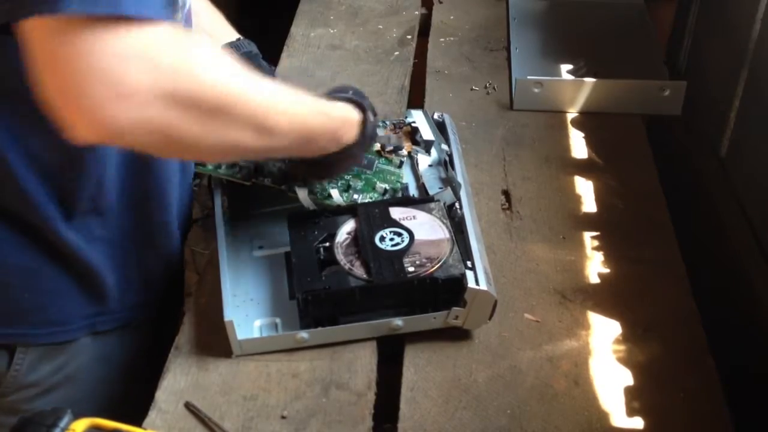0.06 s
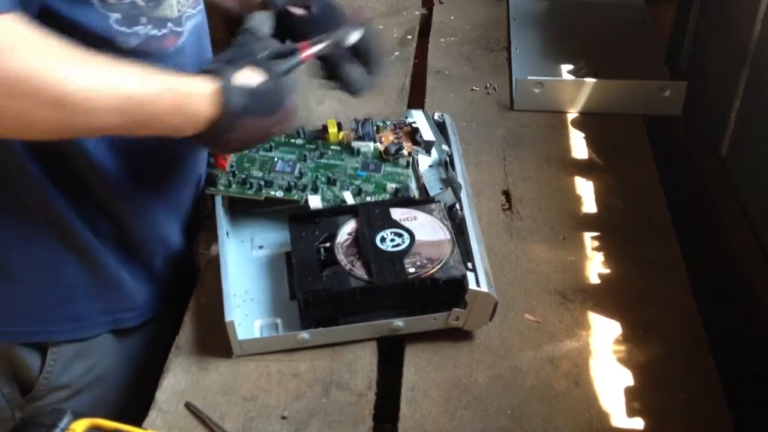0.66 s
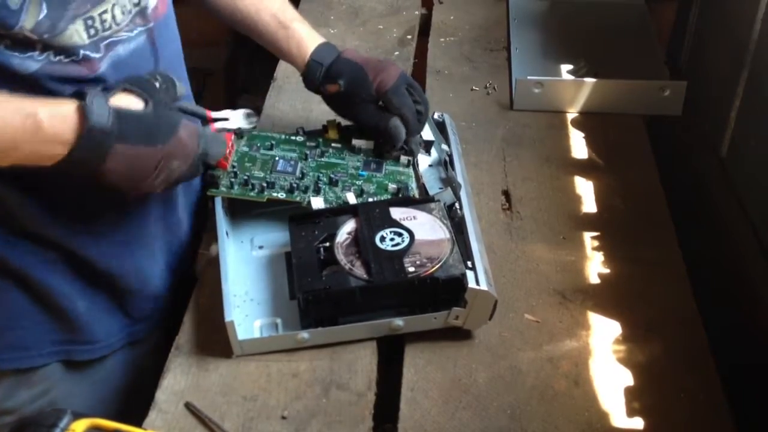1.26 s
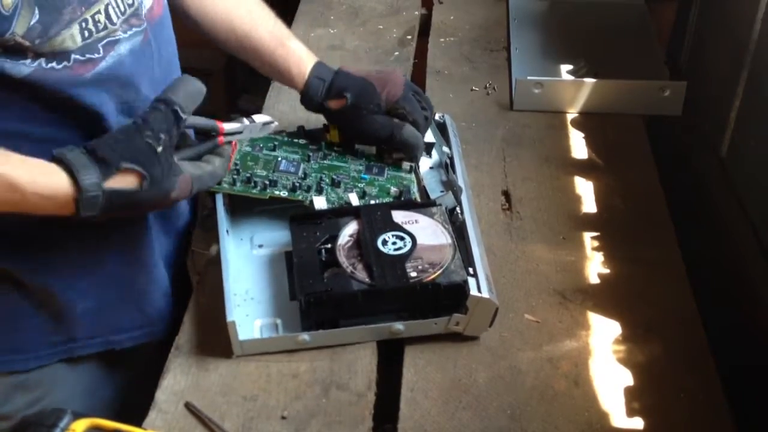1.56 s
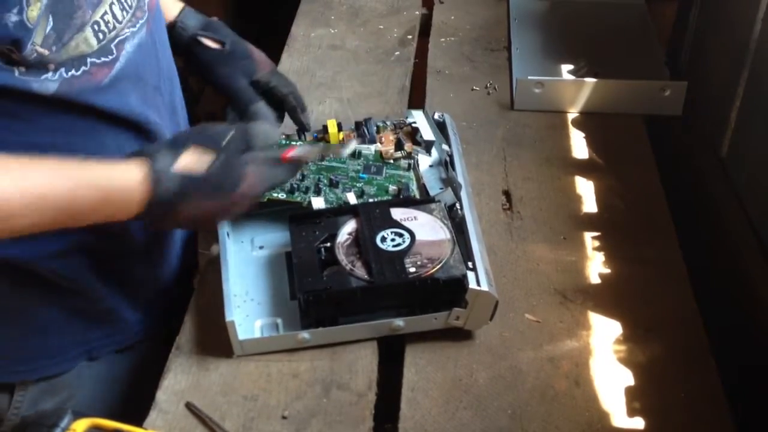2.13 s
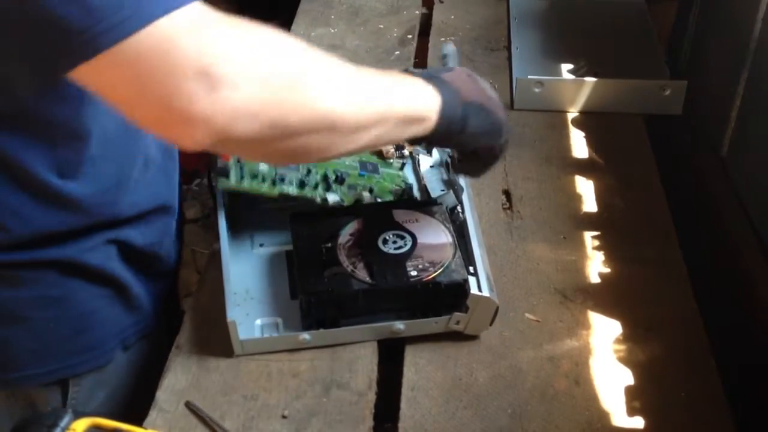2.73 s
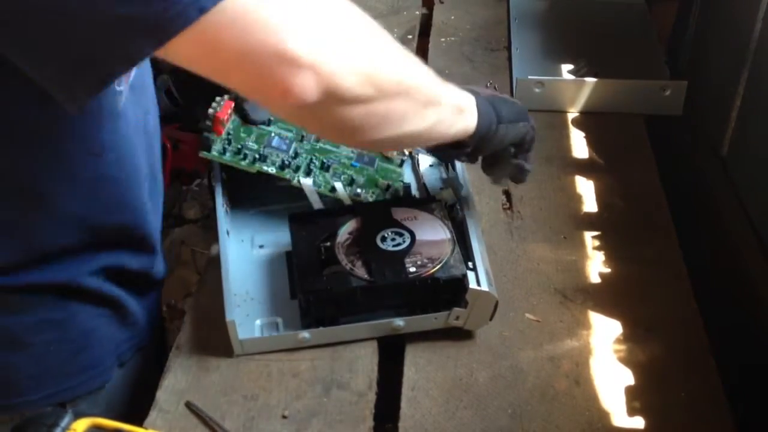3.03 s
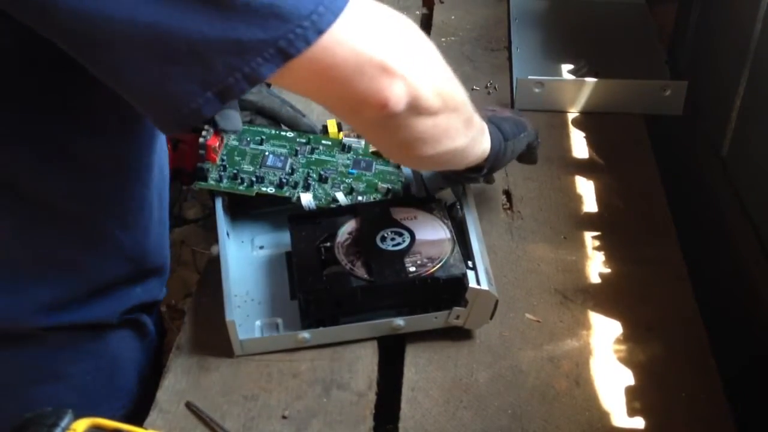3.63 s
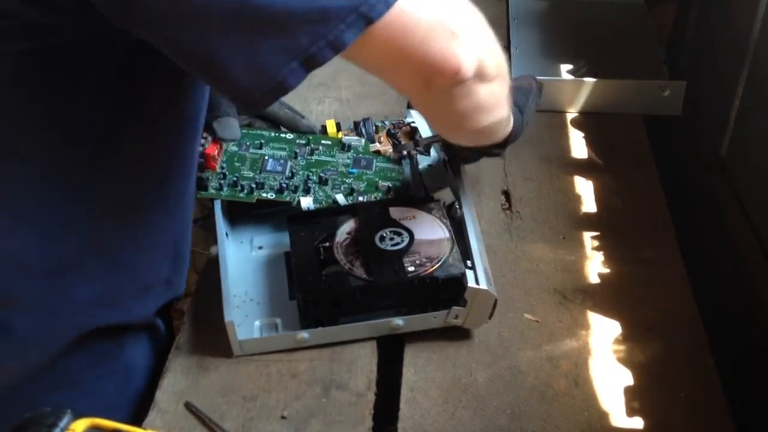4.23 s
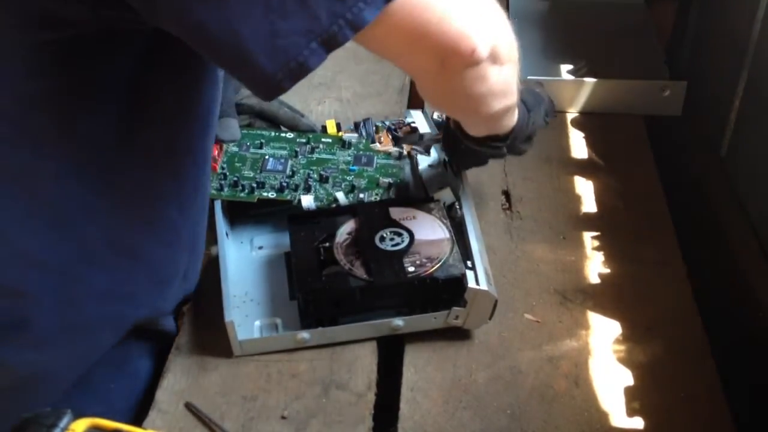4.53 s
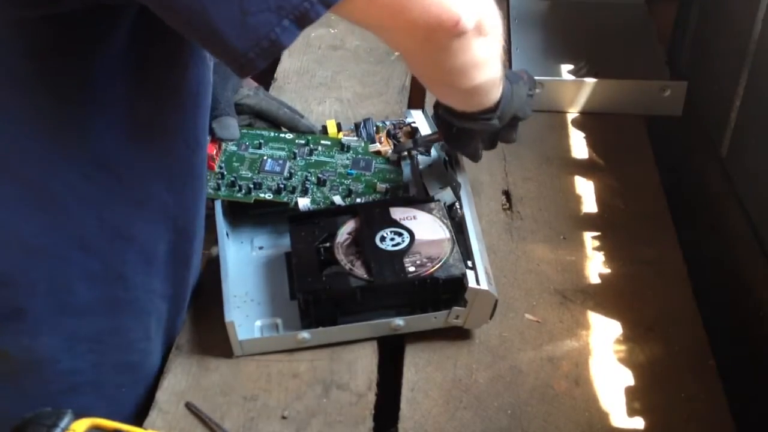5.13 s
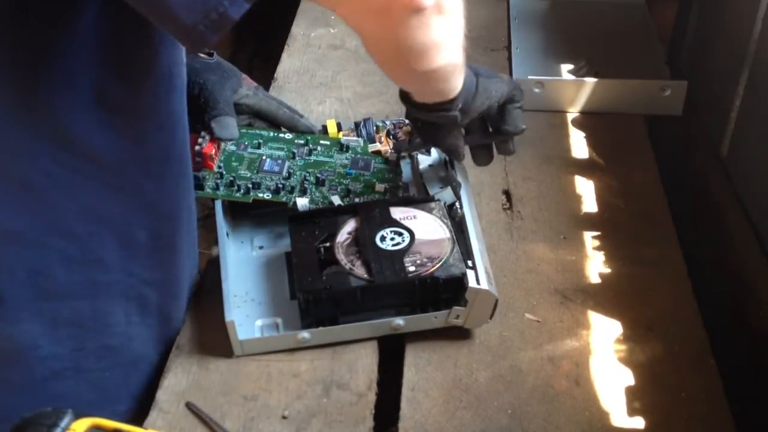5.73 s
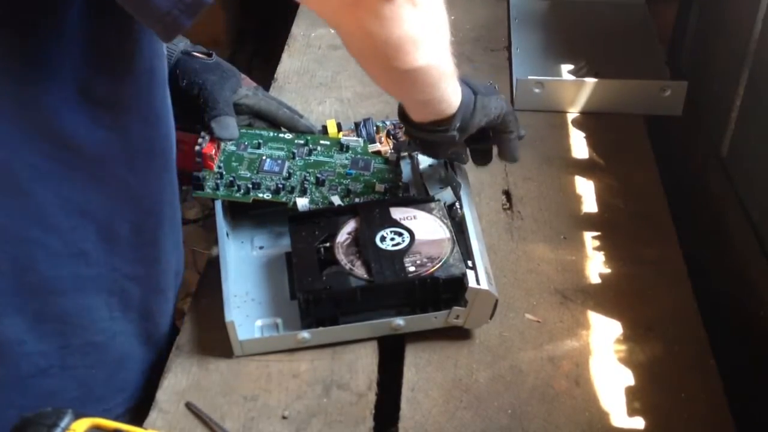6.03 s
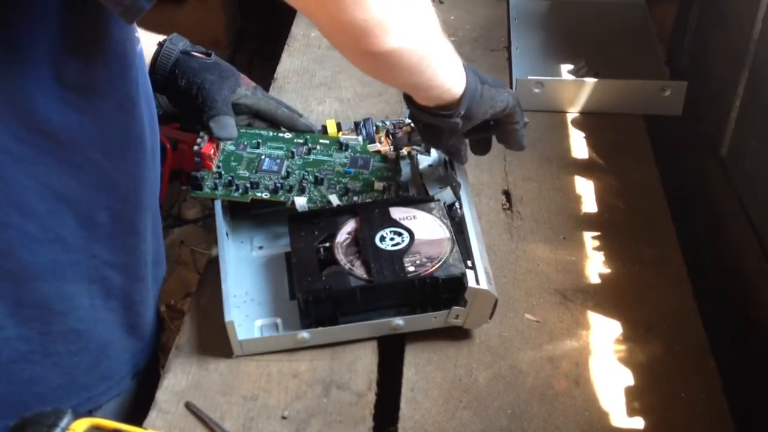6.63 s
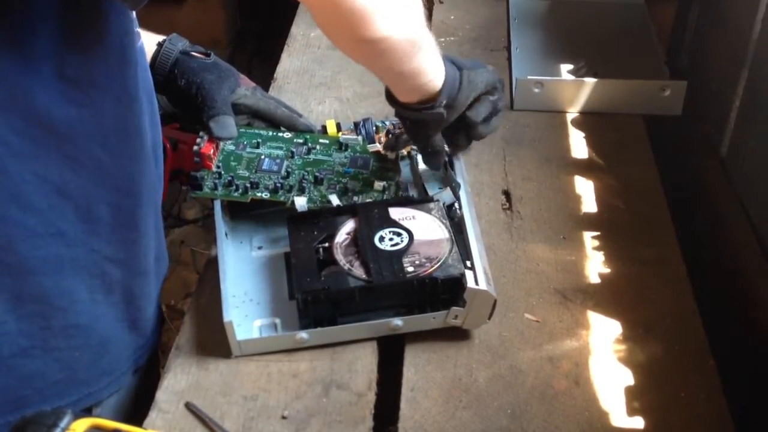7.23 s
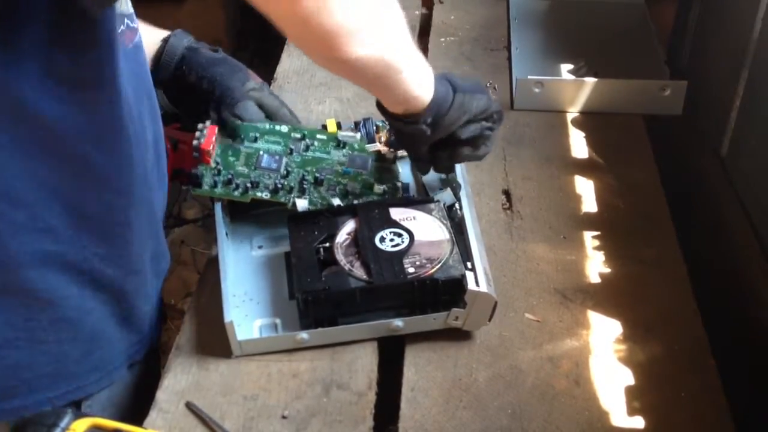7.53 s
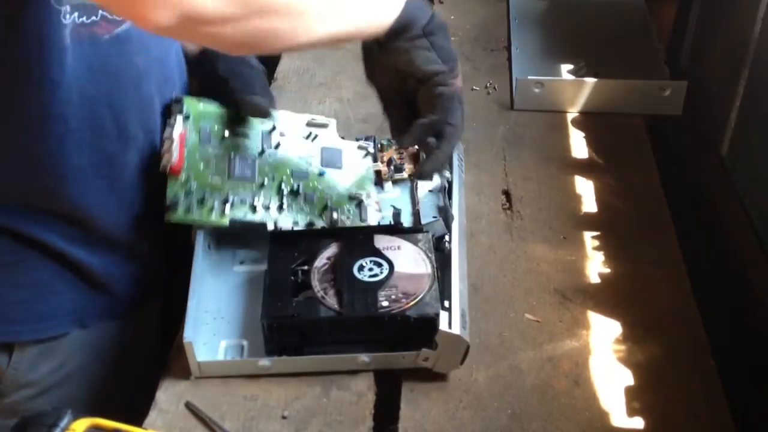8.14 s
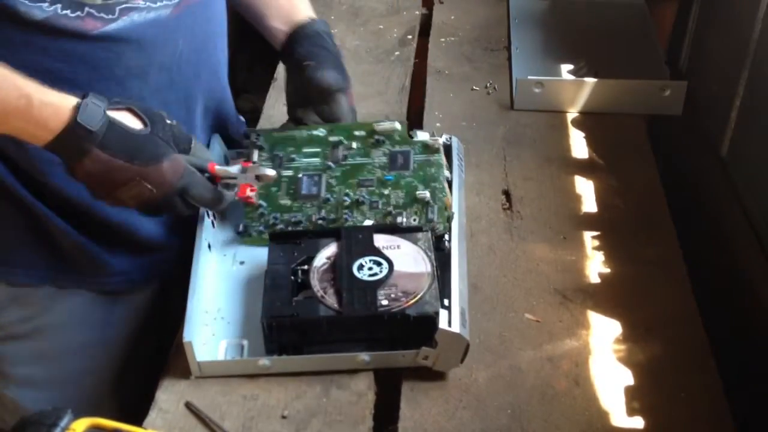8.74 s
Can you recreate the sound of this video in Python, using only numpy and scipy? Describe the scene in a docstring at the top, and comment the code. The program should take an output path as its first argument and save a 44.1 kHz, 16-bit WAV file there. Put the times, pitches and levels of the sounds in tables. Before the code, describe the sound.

Gloves rustle and a circuit board clacks against sheet metal on a wooden bench, with two sharp snips of wire clippers.

```python
"""In a small shed, gloves rustle as a circuit board is shifted, knocked and scraped in a sheet-metal
chassis; each contact excites the modes of the board, the chassis and the plank bench beneath.
From about 4 s a bird chips faintly outside. Wire clippers snip a metal clip at 4.4 s and another
at 7.3 s, each a crack of fracture with a brief ring of steel; a faint high tone wavers from 5.9 to 7.6 s.
Last, the board is lifted out, turned over and dropped in, its bracket landing at 8.5 s."""
import sys
import numpy as np
from scipy import signal
from scipy.fft import rfft, irfft
from scipy.io import wavfile
from scipy.ndimage import uniform_filter1d

SR = 44100
rng = np.random.default_rng(int(sys.argv[2]) if len(sys.argv) > 2 else 0)


def wav_record(signal):
    """Record a signal, one row per channel, as 16-bit PCM in the file named by sys.argv[1]."""
    frames = np.transpose(np.atleast_2d(signal))
    bounded = np.clip(frames, -1, 1)
    # unit amplitude maps onto the largest positive 16-bit level
    quanta = np.round(bounded * 32767).astype(np.int16)
    wavfile.write(sys.argv[1], SR, quanta)


N = 391608
T = np.arange(SR // 2) / SR  # time within one event, s
ORDINARY_HARDNESS_DB = -11.5  # hardness is the level of a contact's tick over its clack

# Spectrum of the still air: frequency_hz, gain_db
AIR_SPECTRUM = [(30, -35.5), (60, -35), (130, -3.5), (210, -7), (280, -12), (430, -18), (600, -16.5),
                (1000, -23), (2000, -26.5), (2850, -23), (3600, -24), (4600, -31.5), (15000, -37)]
# Effort of gloves and sleeves rubbing on the work: time_s, level_db
HANDLING_EFFORT = [(0.0, -63.5), (0.34, -59), (0.81, -63.5), (1.01, -54.5), (1.24, -63.5), (2.07, -67.5),
                   (2.62, -56.5), (3.31, -63), (5.71, -74.5), (7.2, -64), (7.54, -52), (8.41, -58),
                   (8.56, -48), (8.88, -54.5)]
# Spectrum of rubbing cloth: frequency_hz, gain_db
CLOTH_SPECTRUM = [(400, -11), (900, 2), (1500, -3), (2800, 0.5), (3600, -7), (4400, -16), (7500, -17.5),
                  (10000, -22), (15000, -17.5)]
# Modes of the chassis floor panel: pitch_hz, gain_db, t60_s
FLOOR_MODES = [(395.5, -3, 0.085), (400, -12, 0.1535), (413, 7.5, 0.2), (436.5, 6, 0.17),
               (481.5, -12.5, 0.207), (518, -8.5, 0.29)]
# Modes of the loaded bench planks: pitch_hz, gain_db, t60_s
PLANK_MODES = [(100.3, -9.5, 0.41), (125, -3, 0.2), (140.1, -1, 0.88), (166.3, 2, 0.51), (210.1, 9, 0.22),
               (223.1, 5.5, 0.33), (273.4, -6, 0.22)]
# Board and tool striking the chassis: start_s, clack_db, hardness_db, centre_hz, chatter_s, thud_db
STRIKES = [ (0.062, -54, -14, 1790, .013, -53.5), (0.162, -40, -12, 3030, 0.018, -52.5),
           (0.402, -39.5, -14.5, 2170, .006, -47), (0.477, -33, -6.5, 2560, 0.0099, -36.5),
           (0.498, -31, -17.5, 2030, 0.031, -28.5), (0.515, -40, -9.5, 2100, 0.034, -28.5),
           (0.757, -54, -13, 1720, 0.023, -42), (0.801, -35.5, -13.5, 1540, 0.014, -41),
           (0.824, -39.5, -13.5, 1400, 0.019, -44.5), (0.978, -41, -17, 2140, 0.0066, -45.5),
           (1.089, -43, -13.5, 1700, 0.018, -51), (1.15, -50.5, -10.5, 1470, 0.041, -39),
           (1.203, -44.5, -20, 1400, 0.0081, -57.5), (1.522, -39.5, -17, 1600, 0.017, -29.5),
           (1.645, -40.5, -12.5, 1990, .007, -47), (1.689, -43.5, -11, 1490, 0.013, -40.5),
           (1.978, -55.5, -24, 1630, 0.026, -46.5), (2.205, -43.5, -14, 1430, 0.013, -48.5),
           (2.326, -39, -16, 1800, 0.023, -27), (2.481, -43.5, -14.5, 2210, 0.01, -36),
           (2.523, -40, -12, 1550, 0.021, -38.5), (2.82, -41.5, -4, 2410, 0.0068, -60),
           (2.841, -36.5, -3, 2290, 0.0095, -36.5), (3.113, -43, -9, 1790, 0.0086, -32.5),
           (3.35, -76, -16, 1900, 0.0069, -49.5), (4.359, -60, -9, 2120, .003, -69),
           (4.436, -30, -9.5, 1470, 0.0099, -33.5), (5.136, -56.5, -15, 1880, .008, -60),
           (6.084, -53.5, -9, 2490, 0.0041, -59.5), (6.191, -55, -15.5, 1860, 0.014, -50),
           (6.303, -55.5, -7, 2440, .015, -57), (6.509, -57.5, -13, 2100, 0.0036, -61.5),
           (6.867, -45, -6, 2040, .004, -47), (6.88, -33, -13, 2110, .013, -38),
           (7.153, -32, -10, 2590, 0.011, -37.5), (7.343, -35, -10, 2000, 0.009, -37.5),
           (7.535, -46, -24, 1770, 0.022, -26.5), (7.652, -35, -12.5, 2290, 0.0079, -32),
           (7.68, -40, -10.5, 1680, 0.019, -28), (7.872, -50.5, -14, 2300, 0.036, -37.5),
           (8.016, -32, -10, 2200, 0.0028, -34.5), (8.072, -38.5, -11.5, 2100, .003, -39.5),
           (8.096, -38.5, -12, 2100, 0.0065, -39.5), (8.161, -31, -10.5, 2260, 0.0044, -33.5),
           (8.19, -36.5, -12.5, 2010, 0.0092, -38), (8.288, -53.5, -7, 1940, 0.0046, -48),
           (8.389, -33, -6.5, 1540, .007, -40), (8.485, -21.5, -12.5, 1920, 0.031, -15.5),
           (8.538, -22.5, -11.5, 2040, 0.019, -24), (8.618, -39.5, -12, 1590, 0.033, -23),
           (8.699, -45.5, -6.5, 1750, 0.0063, -58)]
# Spectrum of the board's dense ring: frequency_hz, gain_db
BOARD_SPECTRUM = [(300, -33), (600, 2.5), (1000, 2.5), (1400, -2.5), (2000, -7.5), (3000, -1), (3650, -3.5),
                  (4200, -13.5), (6000, -50)]
# Modes of the board and chassis walls: pitch_hz, gain_db, t60_s
BOARD_WALL_MODES = [(1022, -12.5, 0.037), (1070.4, 2, 0.12), (1173, -5, 0.12), (1324, -8, 0.25),
                    (1639, 8, 0.024), (2213, 12, 0.04), (2364, 6, 0.026), (2620, -0.5, 0.092),
                    (3034, 0.5, 0.14), (3710, 4.5, 0.028)]
# Spectrum of the fine tick of a contact: frequency_hz, gain_db
TICK_SPECTRUM = [(2500, -35), (4300, -4.5), (6000, 3.5), (8000, 3), (9800, -3.5), (12000, -2),
                 (14000, -6.5), (15500, -15.5)]
# Spectra of the panel's damped flexing and of its whole thud: frequency_hz, gain_db
FLEX_SPECTRUM = [(250, -18.5), (370, -7), (430, -6), (510, -3.5), (600, -21), (1000, -7.5), (1800, -44)]
PANEL_SPECTRUM = [(200, -9), (370, 5.5), (500, 6), (700, -4.5), (1500, -14.5)]
# Spectra of the planks' damped sag and of their whole thud: frequency_hz, gain_db
SAG_SPECTRUM = [(60, -28.5), (120, 6.5), (290, -7.5), (500, -26.5)]
BENCH_SPECTRUM = [(50, -12.5), (110, 0), (280, 9.5), (600, -16)]
# Board edge dragged over metal: start_s, length_s, scrape_db, panel_db, bench_db
DRAGS = [(0.24, 0.072, -50, -50.5, -61), (0.34, .13, -50, -39, -40.5), (0.81, .07, -66, -43, -40),
         (1.0, 0.15, -52, -43.5, -47.5), (1.495, 0.027, -48.5, -41.5, -51), (1.69, 0.099, -49, -42, -49.5),
         (2.49, 0.071, -42, -42.5, -45.5), (2.68, .11, -52.5, -43, -52), (3.09, 0.08, -50.5, -33, -36.5),
         (7.135, 0.064, -46, -32.5, -60), (7.56, 0.07, -38.5, -37, -34.5), (7.665, 0.088, -41, -31, -56),
         (8.11, 0.03, -47.5, -37, -36.5), (8.76, 0.087, -49, -51, -56)]
# Calls of the distant bird: time_s, level_db
BIRD_CALLS = [(3.97, -76), (4.9, -77), (5.71, -78), (6.65, -73), (7.12, -75), (7.84, -69)]
# Steel on steel, two cuts and then the bracket landing: start_s, pitch_hz, ring_db, decay_s, crack_db
STEEL_SNAPS = [(4.4282, 1950, -13.5, 0.0015, -17.5), (7.3429, 1890, -11, 0.0012, -24.5),
               (8.4855, 1756, -14.5, 0.0034, -22.5)]
# Modes of the jaws and the cut clip: pitch_ratio, gain_db
STEEL_MODES = [(1, 1), (1.3, -4.5), (2.45, -17.5)]
# Spectrum of the fracture: frequency_hz, gain_db
CRACK_SPECTRUM = [(200, -36), (500, -4), (1200, -4), (1700, 2.5), (2700, 6), (4300, -0.5), (6500, -5),
                  (8400, 1.5), (9800, -5), (11500, 2.5), (15000, -10.5)]


def undb(db):
    """Convert decibels to an amplitude ratio."""
    return 10 ** (np.asarray(db) / 20)


def level(x, db):
    """Set the overall rms level."""
    return x * undb(db) / np.sqrt(np.mean(x ** 2))


def loudest(x, db, size):
    """Set the rms level of the loudest stretch of `size` samples."""
    return x * undb(db) / np.sqrt(uniform_filter1d(x ** 2, size, mode="constant").max())


def unit(x):
    """Normalise to unit energy."""
    return x / np.sqrt(np.sum(x ** 2))


def add(out, start_s, x):
    """Superposition: x adds to the sound already present."""
    i = max(int(start_s * SR), 0)
    out[i:i + len(x)] += x[:max(N - i, 0)]


def through(x, response):
    """Convolution: a linear system acts through its impulse response."""
    return signal.fftconvolve(x, response)[:len(x)]


def colour(x, spectrum, size=2048):
    """Minimum-phase filtering: folding the cepstrum gives a causal response with this spectrum."""
    hz, db = np.transpose(spectrum)
    bins_hz = np.maximum(np.arange(size // 2 + 1) * SR / size, 1)
    gain = undb(np.interp(np.log(bins_hz), np.log(hz), db))
    cepstrum = irfft(np.log(gain))
    cepstrum[1:size // 2] *= 2
    cepstrum[size // 2 + 1:] = 0
    return through(x, irfft(np.exp(rfft(cepstrum))))


def fade(t60_s):
    """Exponential damping, 60 dB down after t60_s."""
    return np.exp(-np.log(1000) * T / t60_s)


def arch(length_s):
    """A half-sine pulse."""
    return np.sin(np.pi * np.minimum(T / length_s, 1))


def drift(size):
    """Low-passed noise of unit rms, turning about every `size` samples."""
    smoothed = uniform_filter1d(rng.standard_normal(N), size, mode="wrap")
    return level(uniform_filter1d(smoothed, size, mode="wrap"), 0)


def ring(modes, scatter_db, detune):
    """Modal response: a sum of damped sinusoids, weighted differently at every point of contact."""
    hz, db, t60_s = np.transpose(modes)[:, :, None]
    strength, mistuning, side = rng.standard_normal((3, len(modes), 1))
    waves = np.sign(side) * np.sin(2 * np.pi * hz * (1 + detune * mistuning) * T)
    return np.sum(undb(db + scatter_db * strength) * fade(t60_s) * waves, axis=0)


def shed(x, near_db, far_db):
    """Diffuse reverberation: click energy returns as noise, first from the bench, then the walls."""
    near = undb(near_db) * unit(fade(t60_s=.06) * (T > .002))
    far = undb(far_db) * unit(fade(t60_s=.25) * (T > .008))
    energy = through(x ** 2, near ** 2 + far ** 2)
    return x + np.sqrt(abs(energy)) * rng.standard_normal(len(x))


def reverberate(x, near_db, far_db):
    """Reflections smear a tone: it is convolved with the shed's response to an impulse."""
    return through(x, shed(1. * (T == 0), near_db, far_db))


def slips(per_s, spread_db, size):
    """Stick-slip friction: a random train of impulses of uneven strength."""
    slipping = rng.random(size) < per_s / SR
    strength = undb(spread_db * np.clip(rng.standard_normal(size), -2, 2))
    return slipping * strength * rng.choice([-1, 1], size)


def still_air():
    """Ambient noise: steady and broadband, strongest in the bass."""
    return level(colour(rng.standard_normal(N), AIR_SPECTRUM, size=8192), db=-65)


def handling():
    """Friction: cloth rustles in fits, small parts tick, and rubbing drives panel and plank modes."""
    effort_db = np.interp(np.arange(N) / SR, *np.transpose(HANDLING_EFFORT))
    rustle = colour(slips(per_s=3300, spread_db=3.7, size=N), CLOTH_SPECTRUM)
    rustle = level(rustle, -4.4) * undb(2 * drift(size=2000))
    ticks = shed(slips(per_s=8.5, spread_db=2.7, size=N), near_db=5, far_db=3.5)
    ticks = level(colour(ticks, CLOTH_SPECTRUM), -10)
    panel = unit(ring(FLOOR_MODES, scatter_db=4.5, detune=.00495))
    bench = unit(ring(PLANK_MODES, scatter_db=4.5, detune=.00495))
    murmur = through(rng.standard_normal(N), panel + bench)
    murmur = level(murmur, 2) * undb(5 * drift(size=2000))
    return (rustle + ticks + murmur) * undb(effort_db)


def small_parts(count=24, t60_s=.07):
    """Small bodies resonate high: each contact excites other modes of pins, tabs and cans."""
    return ring([(hz, 0, t60_s) for hz in rng.uniform(3000, 14000, count)], scatter_db=6.5, detune=0)


def board(force, body_db, tick_db, centre_hz):
    """Forced vibration of board and chassis walls; the place of contact sets the brightness."""
    # 8 dB weaker for each octave away from the centre
    spectrum = [(hz, db - 8 * abs(np.log2(hz / centre_hz))) for hz, db in BOARD_SPECTRUM]
    body = colour(shed(force, near_db=-2.5, far_db=-6), spectrum)
    walls = through(body, ring(BOARD_WALL_MODES, scatter_db=3.5, detune=.0055))
    body = unit(body) + undb(-6) * unit(walls)
    tick = colour(shed(force, near_db=-2.5, far_db=-7.5), TICK_SPECTRUM)
    tick = unit(tick) + undb(-8) * unit(through(tick, small_parts()))
    return loudest(body, body_db, size=265) + loudest(tick, tick_db, size=265)


def knock(body_db, tick_db, centre_hz, chatter_s, sharp_s=.0105):
    """Impact: a brief contact opens with an impulse; a longer one builds, then chatters to rest."""
    chatter = np.exp(-(T / chatter_s) ** 2) * (1 - np.exp(-T / (.11 * chatter_s)))
    force = unit(slips(per_s=4000, spread_db=5.4, size=len(T)) * chatter + 1e-9)
    force[0] += undb(-5) / (1 + (chatter_s / sharp_s) ** 2)
    return board(force, body_db, tick_db, centre_hz)


def thud(push_s, panel_db, bench_db):
    """Structure-borne sound: an uneven push drives modes and damped flexing of panel and planks."""
    force = rng.standard_normal(len(T)) * arch(push_s)
    panel = through(force, ring(FLOOR_MODES, scatter_db=3.5, detune=.0094))
    flex = colour(shed(force, near_db=-17.5, far_db=-1), FLEX_SPECTRUM)
    panel = colour(unit(panel) + undb(-1.5) * unit(flex), PANEL_SPECTRUM)
    bench = through(force, ring(PLANK_MODES, scatter_db=-.5, detune=.014))
    sag = colour(force, SAG_SPECTRUM)
    bench = colour(unit(bench) + undb(-5.5) * unit(sag), BENCH_SPECTRUM)
    return loudest(panel, panel_db, size=530) + loudest(bench, bench_db, size=530)


def strike(clack_db, hardness_db, centre_hz, chatter_s, thud_db, lag_s=.002):
    """Momentum transfer: a clack, then a shove; the softer the contact, the more the planks move."""
    clack = knock(clack_db, clack_db + hardness_db, centre_hz, chatter_s)
    bench_db = thud_db - 7.5 - .5 * (hardness_db - ORDINARY_HARDNESS_DB)
    shove = thud(push_s=.024, panel_db=thud_db, bench_db=bench_db)
    return clack + np.pad(shove, (int(lag_s * SR), 0))[:len(T)]


def nudges(per_s=5.4, mean_db=-65, spread_db=4.5):
    """Weak impacts: fingers and tool touch the chassis at random moments."""
    out = np.zeros(N)
    for when, strength in rng.random((int(per_s * N / SR), 2)):
        db = mean_db + spread_db * (2 * strength - 1)
        touch = strike(db, ORDINARY_HARDNESS_DB, centre_hz=1800, chatter_s=.0067, thud_db=db + .5)
        add(out, when * N / SR, touch)
    return out


def drag(length_s, scrape_db, panel_db, bench_db):
    """Stick-slip: the board's edge catches as pressure swells and falls, shaking the chassis."""
    pressure = arch(length_s).clip(0) ** .33
    force = pressure * slips(per_s=1200, spread_db=3.8, size=len(T))
    scrape = board(force, body_db=scrape_db, tick_db=scrape_db - 11, centre_hz=1750)
    return scrape + thud(length_s, panel_db, bench_db)


def bird_chip(level_db, pitch_hz=7500, waver_hz=500):
    """Frequency modulation: a thin, wavering call, smeared by distance."""
    waver = level(uniform_filter1d(rng.standard_normal(len(T)), 40), 0)
    phase = 2 * np.pi * np.cumsum(pitch_hz + waver_hz * waver) / SR
    call = np.sin(phase) * arch(length_s=.058)
    return loudest(reverberate(call, near_db=6, far_db=6), level_db, size=900)


def steel_snap(pitch_hz, ring_db, decay_s, crack_db):
    """Shock excitation: fracture or impact gives a crack, and the steel rings for a few cycles."""
    steel = sum(undb(db) * np.sin(2 * np.pi * pitch_hz * ratio * T) for ratio, db in STEEL_MODES)
    envelope = np.exp(-T / decay_s) * (1 - np.exp(-T / .0017))
    steel = loudest(steel * envelope, ring_db, size=100)
    burst = rng.standard_normal(len(T)) * np.exp(-T / .0011) * (1 - np.exp(-T / .0005))
    crack = colour(shed(burst, near_db=-1.5, far_db=-9), CRACK_SPECTRUM)
    return reverberate(steel, near_db=-7.5, far_db=-17) + loudest(crack, crack_db, size=100)


def whine(start_s=5.85, end_s=7.6, pitch_hz=2785, waver_hz=42):
    """Random modulation: a faint high tone, unsteady in pitch and level, comes and goes."""
    phase = 2 * np.pi * np.cumsum(pitch_hz + waver_hz * drift(size=200)) / SR
    tone = np.sin(phase) * undb(7.1 * drift(size=1200))
    swell = np.interp(np.arange(N) / SR, [start_s, start_s + .1, end_s - .1, end_s], [0, 1, 1, 0])
    return level(tone, db=-75) * swell


def scene():
    """Superposition: the bench work, the bird and the still air sum into one channel."""
    out = handling() + whine() + still_air()
    for events, source in ((STEEL_SNAPS, steel_snap), (STRIKES, strike), (DRAGS, drag)):
        for start_s, *settings in events:
            add(out, start_s, source(*settings))
    for time_s, level_db in BIRD_CALLS:
        add(out, time_s - .05, bird_chip(level_db))
    return (out + nudges())[None]


def record(dry, bass_hz=80, top_hz=15500):
    """Band limiting: the microphone thins the deep bass and cuts the top."""
    thinned = signal.sosfilt(signal.butter(2, bass_hz, "high", fs=SR, output="sos"), dry)
    return signal.sosfilt(signal.ellip(10, .2, 80, top_hz, fs=SR, output="sos"), thinned)


dry = scene()
out = record(dry)
wav_record(out)
```